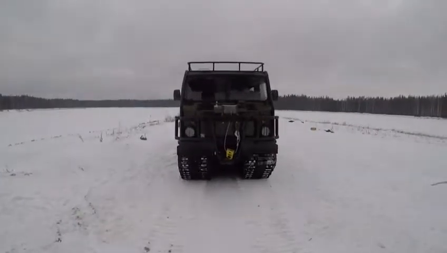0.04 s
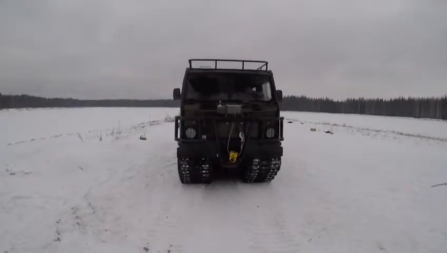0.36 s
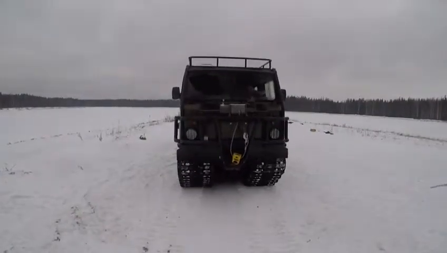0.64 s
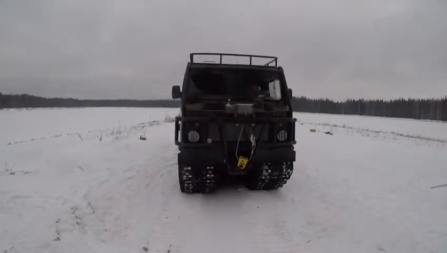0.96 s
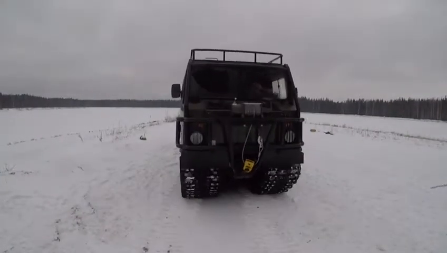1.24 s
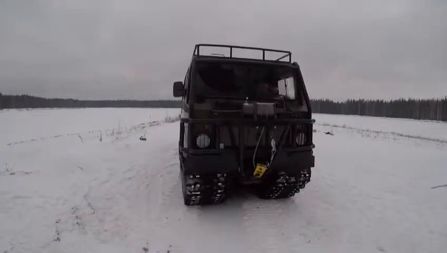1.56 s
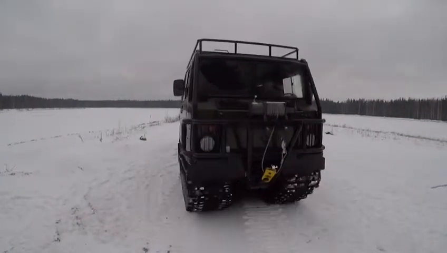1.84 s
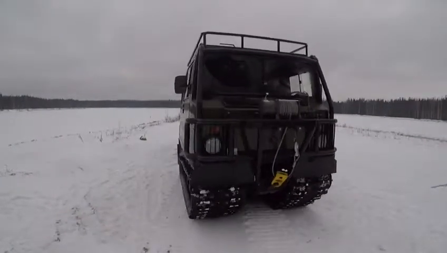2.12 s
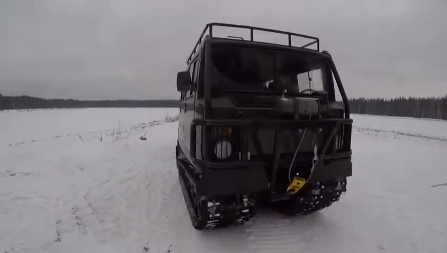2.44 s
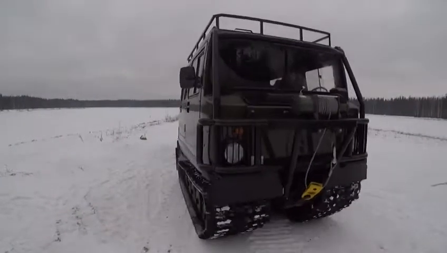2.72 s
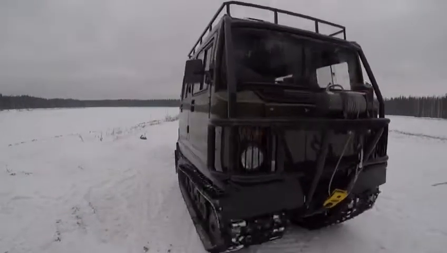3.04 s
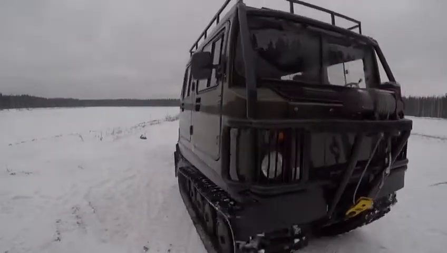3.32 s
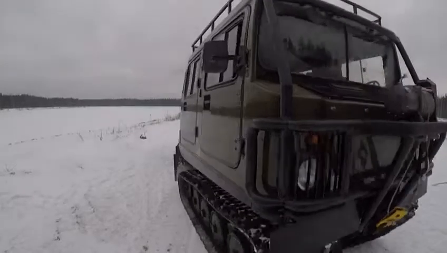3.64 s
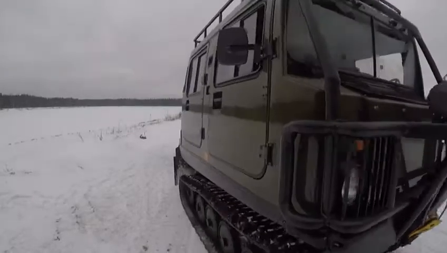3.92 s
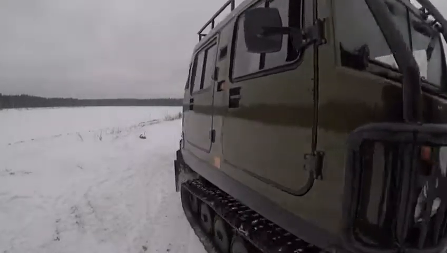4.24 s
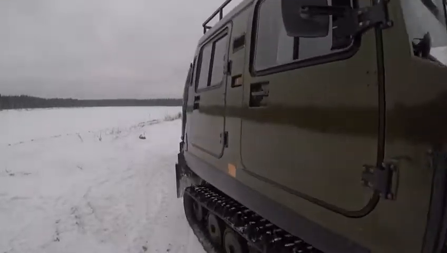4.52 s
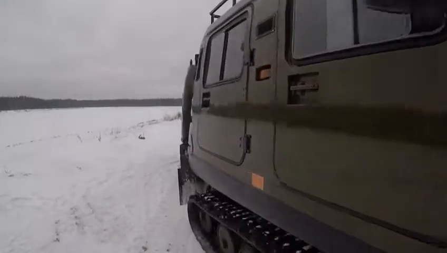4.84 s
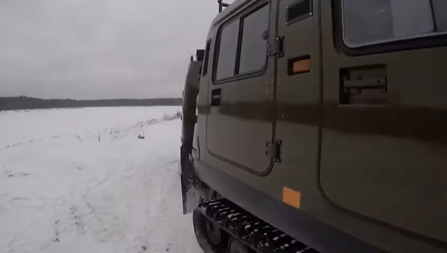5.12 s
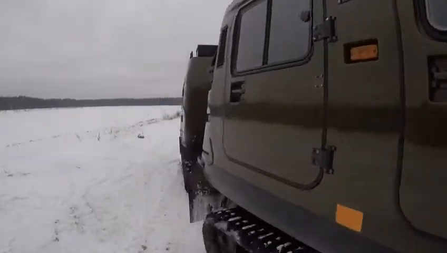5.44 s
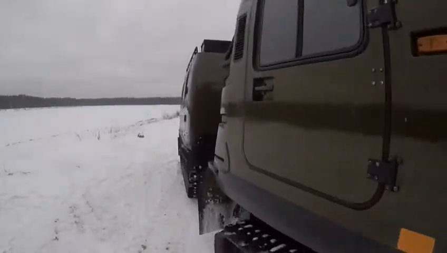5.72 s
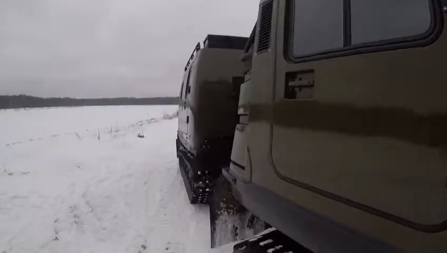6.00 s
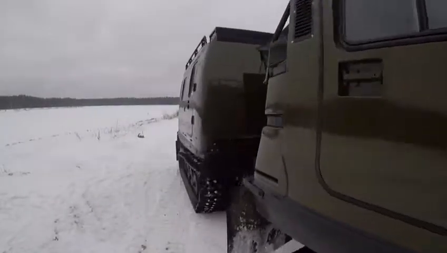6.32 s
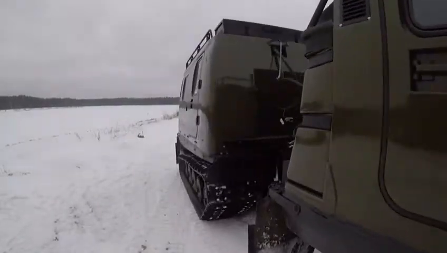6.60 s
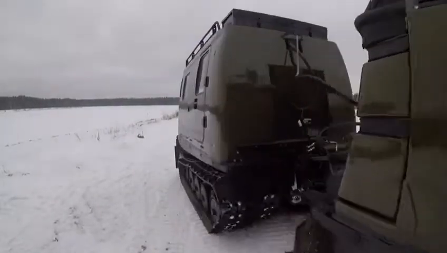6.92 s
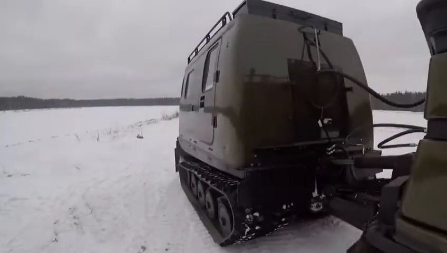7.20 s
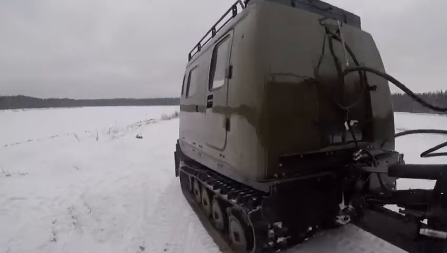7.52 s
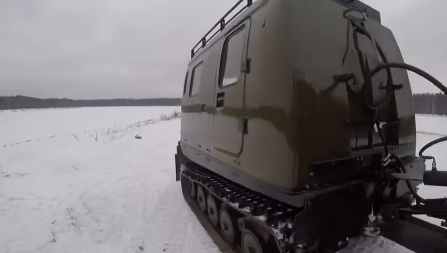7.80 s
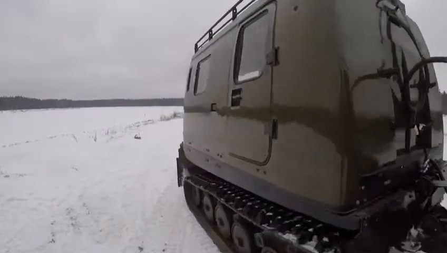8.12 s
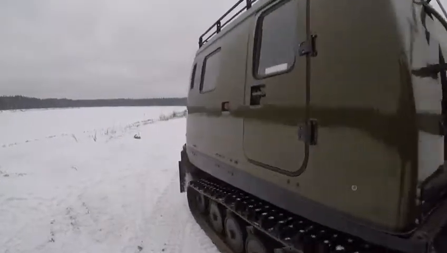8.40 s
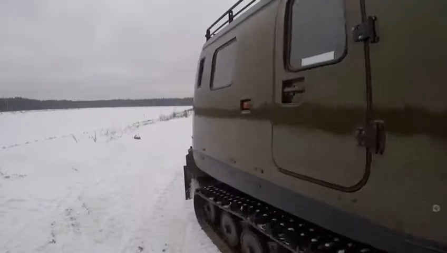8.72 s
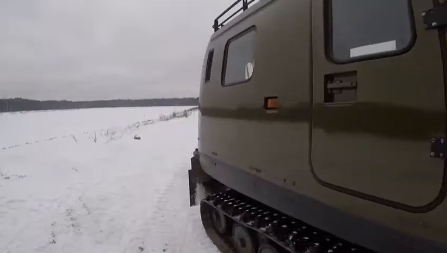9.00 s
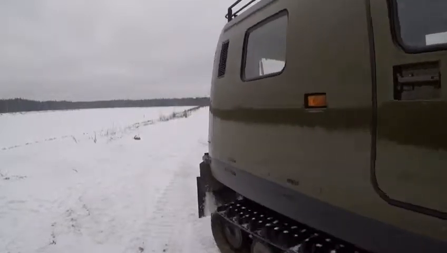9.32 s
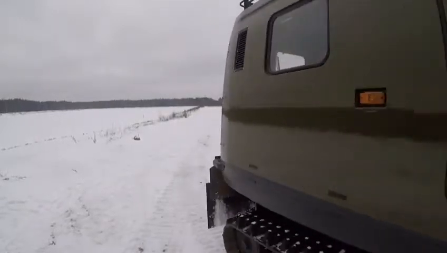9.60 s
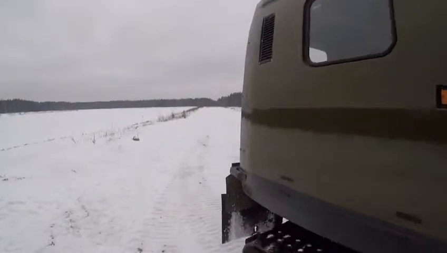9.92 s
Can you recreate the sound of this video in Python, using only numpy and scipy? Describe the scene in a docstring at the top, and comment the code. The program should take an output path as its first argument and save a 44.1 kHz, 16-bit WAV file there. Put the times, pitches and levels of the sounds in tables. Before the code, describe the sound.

A tracked carrier's engine drones and knocks as it crawls over crunching snow and passes close by, its tracks clanking and slapping.

```python
"""A six-cylinder engine drones and knocks ahead of the microphone, out on an open, snowy field.
It drives a two-car tracked carrier that crawls closer and passes at arm's length. The engine whines and
slowly picks up speed; one cylinder knocks about ten times a second until the hull hides it. The running
gear rattles and clanks, snow crunches under the belts, and at the end the rear car's track slaps past."""
import sys
import numpy as np
from scipy import signal
from scipy.fft import rfft, irfft, next_fast_len
from scipy.io import wavfile

SR = 44100
rng = np.random.default_rng(int(sys.argv[2]) if len(sys.argv) > 2 else 0)


def unload_wav(signal):
    """Save mono or channel-first audio to the path in sys.argv[1] as 16-bit WAV at rate SR, clipped to [-1, 1]."""
    wavfile.write(
        sys.argv[1],
        SR,
        np.round(np.clip(np.atleast_2d(signal).T, -1, 1) * 32767).astype(np.int16),
    )


N = 438794


def from_db(db):
    """Decibels to gain."""
    return np.exp(np.asarray(db) * (np.log(10) / 20))

def unit_power(x):
    """Scale to an RMS of 1."""
    return x / np.sqrt(np.mean(x ** 2) + 1e-20)

def in_time(rows):
    """The columns of a curve table, sample by sample."""
    times, *columns = np.transpose(rows)
    return [np.interp(np.arange(N) / SR, times, column) for column in columns]

def in_frequency(rows):
    """The columns of a spectrum table, bin by bin."""
    hz, *columns = np.transpose(rows)
    bins = np.fft.rfftfreq(next_fast_len(N), 1 / SR) + 1e-3
    return [np.interp(np.log(bins), np.log(hz), column) for column in columns]

def filtered(x, gain):
    """Apply a gain per bin."""
    size = next_fast_len(N)
    return irfft(rfft(x, size) * gain, size)[..., :N]

def coloured(x, spectrum):
    """Give x a spectrum that falls away beyond its ends; unit power."""
    (low, low_db), (high, high_db) = spectrum[0], spectrum[-1]
    level_db, = in_frequency([(low / 2, low_db - 40), *spectrum, (high * 2, high_db - 40)])
    return unit_power(filtered(x, from_db(level_db)))

def noise():
    """Two unrelated white noises: the direct and the scattered share of a sound."""
    return rng.standard_normal((2, N))

def drift(rate_hz):
    """A smooth random wander of spread 1."""
    pole = np.exp(-80 * np.pi * rate_hz / SR)
    slow = signal.lfilter([1], [1, -2 * pole, pole * pole], rng.standard_normal(N // 40 + 2002))[2000:]
    return np.interp(np.arange(N) / 40, np.arange(len(slow)), unit_power(slow))

def clicks(times, gains):
    """One click at each time."""
    marks = np.zeros(N)
    np.add.at(marks, np.clip((times * SR).astype(int), 0, N - 1), gains)
    return marks

def blows(times, gains, decay_s):
    """An envelope that jumps at each time and dies away."""
    return signal.lfilter([1], [1, -np.exp(-1 / (decay_s * SR))], clicks(times, gains) + 1e-18)

def grains(per_s, spread_db):
    """Random clicks of uneven size; unit power."""
    sizes = from_db(spread_db * np.minimum(rng.exponential(1, (2, N)), 4))
    return unit_power(noise() * sizes * (rng.random((2, N)) < per_s / SR))

def throb(cycles, depth):
    """One swell per cycle; unit power."""
    return unit_power(np.exp(depth * np.cos(2 * np.pi * cycles)))

def ring(force, hz, t60):
    """A unit click sets a sine of height 1 ringing."""
    pole, angle = from_db(-60 / (t60 * SR)), 2 * np.pi * hz / SR
    return signal.lfilter([0, np.sin(angle)], [1, -2 * pole * np.cos(angle), pole * pole], force + 1e-18)

def struck(times, level_db, modes, scrape, scrape_s, scatter_db):
    """Knocks with a short scrape; each mode swells over a few milliseconds and dies away."""
    force, out = from_db(level_db), 0
    rub = scrape * blows(times, force, scrape_s) * noise() / np.sqrt(scrape_s * SR)
    for k, (hz, mode_db, t60) in enumerate(modes):
        strength = from_db(scatter_db * rng.standard_normal((2, len(times))))
        strength[1] *= rng.choice([-1, 1], len(times))   # the scattered share takes either sign
        knocks = np.array([clicks(times, force * row) for row in strength])
        height = t60 * SR / np.log(1000) / (2 * np.e)
        out += (-1) ** k * from_db(mode_db) / height * ring(ring(knocks + rub, hz, t60), hz, t60)
    return signal.sosfilt(signal.butter(2, modes[0][0] * .7, "high", fs=SR, output="sos"), out)

def passing(level_db, nearest_s, reach_s, approach_db, leave_db):
    """Level of a part driving straight past the microphone; the slopes are dB per doubling of distance."""
    t = np.arange(N) / SR - nearest_s
    return level_db - np.where(t < 0, approach_db, leave_db) * np.log2(np.hypot(1, t / reach_s))

def turning(x, bearing, ahead, alongside):
    """The colour changes as the flank comes into view."""
    return (1 - bearing) * coloured(x, ahead) + bearing * coloured(x, alongside)


# The ground by the microphone. Every _PASS: level_db, nearest_s, reach_s, approach_db, leave_db
GROUND_PASS = (-26, 3.5, 2, 4, -0.5)
# Its rumble. Every _SPECTRUM: frequency_hz, density_db
GROUND_SPECTRUM = [(14, -1), (27, -7), (41, 5), (60, 1), (84, 2), (121, 1), (150, -3), (200, -24)]

def ground_rumble():
    """The ground rumbles as the carrier draws near."""
    return from_db(passing(*GROUND_PASS)) * coloured(noise(), GROUND_SPECTRUM)

# The front belt, down at snow level
BELT_PASS = (-35, 4.5, 0.83, 11.5, 7)
BELT_SPECTRUM = [(330, -11), (400, -1.5), (520, -2.5), (620, 1.5), (730, -2.5), (850, -15)]

def belt_swish():
    """The front belt presses the snow with a soft swish."""
    return from_db(passing(*BELT_PASS)) * coloured(noise(), BELT_SPECTRUM)

# Snow under the belts: time_s, hiss_db, crunch_db
SNOW_LEVEL = [(0.0, -44, -56), (0.5, -45.5, -56), (0.9, -42, -51.5), (1.95, -42.5, -54), (2.3, -38, -48),
              (4.4, -39, -49), (4.6, -39, -45), (5.45, -42.5, -51), (5.8, -39, -42), (6.0, -43, -47.5),
              (6.95, -41, -47), (9.9, -48, -51)]
HISS_SPECTRUM = [(2500, -17), (3400, 7.5), (4200, 6.5), (4900, 6.5), (5800, 10.5), (6400, 9.5),
                 (7200, -7.5), (8500, -37)]
CRUNCH_SPECTRUM = [(5500, -8), (7000, 12), (8000, 9.5), (9200, 8.5), (10200, 2.5), (11000, -7.5),
                   (12000, -46)]

def snow(hiss_db, crunch_db, crusts_per_s=4.5):
    """Snow hisses and crunches; small crusts give way at random, each briefly lifting the crunch."""
    hiss = coloured(noise() * from_db(2.24 * drift(27)), HISS_SPECTRUM)
    crunch = grains(per_s=19000, spread_db=-3.0) * from_db(2.6 * drift(13))
    crust_s = np.flatnonzero(rng.random(N) < crusts_per_s / SR) / SR
    crunch *= 1 + blows(crust_s, rng.random(N)[:len(crust_s)], decay_s=0.033)
    return from_db(hiss_db) * hiss + from_db(crunch_db) * coloured(crunch, CRUNCH_SPECTRUM)

# Cold snow on the approach: centre_s, level_db, pitch_hz, half_length_s, glide_share_per_s
SQUEAKS = [(.091, -44, 3680, .005, -5), (.101, -40, 4330, .006, 4), (.211, -46, 4200, 0.011, 1),
           (.89, -39, 4520, 0.012, 1), (.92, -53, 5600, .008, 6), (2.32, -42, 5700, .007, -2),
           (2.44, -40.5, 5760, .009, 1), (2.52, -43, 5400, 0.0097, 3), (2.62, -46, 5360, .008, -3),
           (2.645, -42.5, 4600, 0.014, -8), (2.75, -45, 5060, .008, 0), (2.885, -49, 6600, .01, 0),
           (2.972, -40.5, 6270, 0.0091, 3), (3.01, -43, 4300, .008, 7), (3.13, -46.5, 6600, 0.013, 7),
           (3.165, -42.5, 4180, 0.021, -6.5), (3.375, -42, 6240, 0.01, 6), (4.268, -37, 5710, 0.016, 4),
           (4.457, -41, 5500, .008, -1.5), (4.572, -40, 5000, .01, -1), (4.712, -44, 5040, .008, -3),
           (4.827, -41, 5280, 0.018, 5.5)]

def snow_squeaks(faint_db, gain_db=5.0, faint_per_s=7, low_hz=4130, high_hz=6770, hoarseness=0.25):
    """Snow grains stick and slip under the rubber: brief, hoarse chirps, with fainter ones at random."""
    out, t = np.zeros((2, N)), np.arange(-SR // 20, SR // 20) / SR
    at = np.flatnonzero(rng.random(N - len(t)) < faint_per_s / SR) + len(t) // 2
    tone, size, bend = rng.random((len(at), 3)).T
    faint_hz = low_hz + tone * (high_hz - low_hz)
    faint = zip(at / SR, faint_db[at], faint_hz, 0.019 * (.5 + size), 1.7 * (2 * bend - .5))
    for centre_s, level_db, hz, half_length_s, glide in [*SQUEAKS, *faint]:
        pitch_hz = hz * (1 + glide * t + hoarseness * rng.standard_normal((2, len(t))))
        chirp = np.exp(-(t / half_length_s) ** 2) * np.sin(2 * np.pi * np.cumsum(pitch_hz, axis=1) / SR)
        start = max(int((centre_s + t[0]) * SR), 0)
        out[:, start:start + len(t)] += from_db(level_db + gain_db) * chirp
    stutter = unit_power(from_db(1.5 * drift(120)))
    return out * stutter

# Creaks, knocks and cracks close to the microphone: start_s, level_db, pitch_hz, decay_s
CREAKS_AND_CRACKS = [(3.80, -27.5, 835, 0.088), (3.93, -30, 825, 0.036), (4.378, -27, 2420, 0.007),
                     (4.555, -32, 6500, 0.012), (4.646, -31.5, 2460, 0.017), (4.748, -30, 2320, 0.0082),
                     (4.829, -25, 890, 0.0072), (4.908, -17, 754, 0.0055), (5.003, -19.5, 695, 0.0044),
                     (5.213, -39.5, 8400, 0.015), (5.57, -43, 8140, .012), (5.73, -29, 6700, 0.014),
                     (5.83, -42, 7900, .012), (5.895, -43, 8700, 0.0082), (6.62, -46, 10000, .014),
                     (6.723, -42, 8900, .013), (6.916, -37.5, 8050, 0.025), (7.321, -43, 8950, 0.013),
                     (8.078, -33, 4770, 0.0099)]

def creaks_and_cracks(gain_db=-1.5, band_ratio=1.21, rise_share=0.38):
    """Low creaks and knocks from the passing carrier, and high snow cracks: short bands of noise."""
    out, t = np.zeros((2, N)), np.arange(SR // 5) / SR
    for start_s, level_db, hz, decay_s in CREAKS_AND_CRACKS:
        band = signal.butter(2, [hz / band_ratio, hz * band_ratio], "band", fs=SR, output="sos")
        burst = unit_power(signal.sosfilt(band, rng.standard_normal((2, len(t)))))
        envelope = (1 - np.exp(-t / (rise_share * decay_s))) * np.exp(-(t / decay_s) ** 2 / 2)
        start = int(start_s * SR)
        out[:, start:start + len(t)] += from_db(level_db + gain_db) * burst * envelope
    return out

# The hull and the engine bay, head-on and at arm's length
HULL_PASS = (-25.5, 5.5, 0.97, 2, 1.5)
HULL_AHEAD_SPECTRUM = [(110, -8.5), (150, -5.5), (183, 6.5), (220, -4), (265, 0), (300, -14), (350, -25),
                       (600, -38)]
HULL_NEAR_SPECTRUM = [(110, -20), (156, -11), (186, -3.5), (222, -2.5), (268, -6.5), (306, -3), (350, -35),
                      (600, -41)]
BAY_PASS = (-28.5, 8, 4, 9.5, 41)
BAY_AHEAD_SPECTRUM = [(250, -19), (330, -6), (390, -2.5), (490, -2), (580, -3), (700, -9.5), (850, -11.5),
                      (1100, -32), (2000, -23)]
BAY_NEAR_SPECTRUM = [(240, -3.5), (320, 8.5), (410, 2.5), (520, 3), (640, -3.5), (780, -8), (1000, -11.5),
                     (2000, -28)]

def shaking(cycles, repeat_share, size=4096):
    """Panels shake partly by chance, partly in a slowly changing pattern that repeats each engine cycle."""
    patterns = unit_power(irfft(np.exp(2j * np.pi * rng.random((2, size // 2 + 1)))))
    first, second = patterns[:, (cycles * size).astype(int) % size]
    angle = drift(0.69)
    cos, sin = np.cos(angle), np.sin(angle)
    repeating = np.array([first * cos + second * sin, second * cos - first * sin])
    return np.sqrt(repeat_share) * repeating + np.sqrt(1 - repeat_share) * noise()

def hull_panels(cycles, below_cruise_hz, bearing, loss_db_per_hz=1):
    """The engine shakes the hull, less so below cruising speed."""
    gain = from_db(passing(*HULL_PASS) - loss_db_per_hz * below_cruise_hz)
    panels = shaking(cycles, repeat_share=0.74)
    return gain * turning(panels, bearing, HULL_AHEAD_SPECTRUM, HULL_NEAR_SPECTRUM)

def engine_bay(cycles, firings, bearing):
    """The bay's panels shake, swelling slightly with each firing."""
    panels = shaking(cycles, repeat_share=0.36) * throb(firings, depth=0.095)
    return from_db(passing(*BAY_PASS)) * turning(panels, bearing, BAY_AHEAD_SPECTRUM, BAY_NEAR_SPECTRUM)

# The running gear of both cars, head-on and at arm's length
FRONT_GEAR_PASS = (-32.5, 3.5, 1.53, 3.5, 18)
REAR_GEAR_PASS = (-37, 8, 1.5, 1, 9)
GEAR_AHEAD_SPECTRUM = [(600, -33.5), (900, -3.5), (1080, 11.5), (1220, 2.5), (1400, 4), (1650, 2.5),
                       (2100, -7.5), (2500, -8.5), (3000, -6), (3600, -16.5), (5000, -18.5), (8000, -88)]
GEAR_NEAR_SPECTRUM = [(600, -13), (900, 3.5), (1100, 7), (1350, 5.5), (1650, 2), (2100, -1.5), (2600, -2.5),
                      (3100, -4), (3600, -9.5), (5000, -17), (8000, -40)]

def gear_rattle(cycles, firings, bearing):
    """Loose parts of both cars chatter in time with the engine."""
    beat = throb(cycles - .25, depth=0.13) * throb(firings, depth=0.037)
    rattle = grains(per_s=14000, spread_db=-1.0) * beat * from_db(drift(25))
    gain = np.hypot(from_db(passing(*FRONT_GEAR_PASS)), from_db(passing(*REAR_GEAR_PASS)))
    return gain * turning(rattle, bearing, GEAR_AHEAD_SPECTRUM, GEAR_NEAR_SPECTRUM)

# Wheels and links sliding past the microphone: start_s, level_db, pitch_hz
CLANKS = [(5.316, -31.5, 1210), (5.406, -34, 1190), (5.508, -32, 1390), (5.606, -32.5, 1450),
          (5.708, -32, 1350), (5.881, -36.5, 1500), (5.974, -34, 1550), (6.166, -40.5, 1210),
          (6.313, -32, 1530), (6.42, -32.5, 1700), (6.535, -40, 1890), (6.721, -43, 1460),
          (6.893, -35, 1600), (7.08, -34.5, 1880), (7.14, -33, 1500), (7.172, -31, 1600),
          (7.262, -35.5, 1500), (7.355, -33.5, 1780), (7.44, -36, 1980), (7.536, -35, 1400),
          (7.625, -35, 1300), (7.721, -36, 1400), (7.892, -35, 1400), (7.987, -33, 1130), (8.04, -37, 1630),
          (8.336, -34, 1300), (8.608, -37, 1920)]
# Their ringing steel: pitch_ratio, level_db
CLANK_MODES = [(.74, 1), (1.0, 1), (1.24, -6)]

def gear_clanks(gain_db=-8.5, swell_s=0.01, t60=0.012):
    """Loose steel chatters for a moment, each part ringing at a pitch of its own."""
    out, t = np.zeros((2, N)), np.arange(SR // 8) / SR
    for start_s, level_db, hz in CLANKS:
        chatter = np.gradient(rng.standard_normal((2, len(t))) * t * np.exp(-t / swell_s), axis=1)
        steel = sum((-1) ** k * from_db(mode_db) * ring(chatter, hz * ratio, t60)
                    for k, (ratio, mode_db) in enumerate(CLANK_MODES))
        clank = np.array([unit_power(share) for share in steel])
        start = int(start_s * SR)
        out[:, start:start + len(t)] += from_db(level_db + gain_db) * clank
    return out

# The rear car's track at arm's length: start_s, thud_db, clack_db
SLAPS = [(7.46, -25.5, -36), (7.836, -26, -41), (7.936, -22, -36), (8.004, -25, -34), (8.206, -24, -38),
         (8.301, -22.5, -39), (8.35, -23, -37), (8.481, -22.5, -38), (8.645, -26, -43), (8.753, -24.5, -40),
         (8.858, -21, -35), (8.961, -18.5, -43), (9.042, -21.5, -32), (9.146, -21, -37), (9.232, -21, -35),
         (9.325, -20.5, -24), (9.41, -19.5, -28.5), (9.507, -21.5, -29), (9.594, -23, -28),
         (9.692, -20, -29), (9.785, -23, -31.5), (9.87, -25.5, -28.5)]
# Rubber belt and wheel: pitch_hz, level_db, t60_s
BELT_MODES = [(324.5, -6.5, 0.04), (415, -6, 0.042), (493, -3.5, 0.03), (576, -9.5, 0.027),
              (695, -9, 0.024)]
WHEEL_MODES = [(804, -1.5, 0.012), (1120, -10, 0.017), (1306, -7, 0.01), (1580, -11.5, 0.013)]

def track_slaps(lead_s=0.0041, bounce_s=0.024, bounce_db=-10.0):
    """The belt clacks against a wheel, then its rubber lands with a thud and bounces once."""
    start_s, thud_db, clack_db = np.transpose(SLAPS)
    landing_s = np.r_[start_s, start_s + bounce_s]
    landing_db = np.r_[thud_db, thud_db + bounce_db] + 0.5
    thuds = struck(landing_s, landing_db, BELT_MODES, scrape=0.88, scrape_s=0.01, scatter_db=2.5)
    clacks = struck(start_s - lead_s, clack_db + 1, WHEEL_MODES, scrape=1.44, scrape_s=0.018, scatter_db=3.5)
    return thuds + clacks

# Clatter from the grille, soon hidden from the microphone by the hull: time_s, level_db
CLATTER_LEVEL = [(0, -25.5), (.75, -18.5), (1.15, -20.5), (1.5, -18), (2.7, -22), (3.05, -16.5), (3.5, -21),
                 (4.3, -26), (4.7, -29), (5.2, -32), (6, -39), (9.95, -43)]
# The six firings: place_in_cycle, level_db
CYLINDERS = [(.015, -5.5), (.182, 0.5), (.365, -10.5), (.527, -4), (.71, -13.5), (.875, -22)]
# The engine block: pitch_hz, level_db, t60_s
BLOCK_MODES = [(1130, -14.5, 0.013), (1201, 0, 0.027)]

def combustion_clatter(cycles, uneven_db=0.3, jitter_s=0.00056):
    """Every firing rings the engine block, each cylinder with a strength of its own."""
    place, cylinder_db = np.transpose(CYLINDERS)
    whole_cycles = np.arange(int(cycles[-1]))
    at = np.minimum(np.searchsorted(cycles, whole_cycles[:, None] + place), N - 1)
    level_db = in_time(CLATTER_LEVEL)[0][at] + cylinder_db + uneven_db * rng.standard_normal(at.shape)
    times = at / SR + jitter_s * rng.standard_normal(at.shape)
    return struck(times.ravel(), level_db.ravel(), BLOCK_MODES, scrape=0.14, scrape_s=0.0034, scatter_db=2.1)

# The noisy cylinder, heard from in front: start_s, level_db
KNOCKS = [(.115, -31.5), (.226, -32), (.336, -32), (0.447, -41), (0.55, -31.5), (0.656, -29), (0.76, -30),
          (.862, -29.5), (.965, -34), (1.067, -33), (1.17, -29), (1.272, -27), (1.376, -30), (1.476, -27),
          (1.579, -29.5), (1.676, -28.5), (1.775, -27.5), (1.873, -24), (1.97, -31.5), (2.067, -28.5),
          (2.162, -25.5), (2.259, -28), (2.358, -26), (2.456, -23), (2.551, -26), (2.649, -29),
          (2.744, -30), (2.842, -24.5), (2.937, -31), (3.04, -27), (3.132, -29), (3.229, -30), (3.328, -30),
          (3.424, -37), (3.616, -33), (3.712, -44), (3.81, -25.5), (3.903, -26), (4.001, -26.5),
          (4.095, -28), (4.187, -25), (4.285, -39), (4.377, -33), (4.468, -32), (4.654, -41), (4.749, -39),
          (4.938, -32.5), (5.024, -30.5), (5.12, -32), (5.236, -32.5)]
# The engine ringing under its blows: pitch_hz, level_db, t60_s
KNOCK_MODES = [(1113, -1, 0.015), (1272, -8, 0.029), (1490, -15, 0.011), (1612, 0, 0.023),
               (1890, -3.5, 0.015), (2290, -11.5, 0.0093), (2786, -10, 0.02), (3180, -10, .013)]

def cylinder_knock(rebound_s=0.0055):
    """One cylinder gives a hard, bright knock and a rebound in most cycles of the approach."""
    start_s, level_db = np.transpose(KNOCKS)
    blow = struck(start_s, level_db - 1.2, KNOCK_MODES, scrape=1, scrape_s=0.0079, scatter_db=1.8)
    rebound = struck(start_s + rebound_s, level_db - 3, KNOCK_MODES, scrape=1, scrape_s=.008, scatter_db=-2)
    return blow + rebound

# The whine at the microphone: time_s, order_16_db, order_32_db
WHINE_LEVELS = [(0, -66, -68), (.4, -57, -61), (.7, -40, -48), (1.05, -47, -45), (1.4, -54, -58),
                (1.7, -38.5, -59), (2.2, -43, -60), (3.2, -42.5, -64), (3.7, -50, -59), (4.75, -36.5, -51),
                (5.4, -48, -45.5), (6.9, -37, -47), (7.5, -47.5, -59), (7.9, -34.5, -46), (8.6, -43.5, -49),
                (9.95, -53, -58)]

def engine_whine(bank_firings, flutter_db=3.0, wander_rad=1.07):
    """A high engine order and its octave flutter in level and wander in phase."""
    direct = np.zeros(N)
    for order, level_db in zip((16, 32), in_time(WHINE_LEVELS)):
        gain = from_db(level_db + flutter_db * drift(10.6))
        direct += gain * np.cos(2 * np.pi * order * bank_firings + wander_rad * drift(4.2))
    return np.sqrt(2) * direct * [[1], [0]]   # no scattered share

# The loudest notes, swelling in turn as the hull slides past the microphone: time_s, level_db
ORDER_2 = [(0.0, -28.5), (5.05, -20.5), (6.1, -24.5), (6.5, -44), (7.3, -23), (8.45, -20), (8.95, -24),
           (9.9, -21.5)]
ORDER_3 = [(0.0, -44), (0.4, -31.5), (2.05, -27), (4.05, -29.5), (4.75, -37), (6.65, -21.5), (8.1, -18),
           (9.9, -34.5)]
ORDER_4 = [(0.0, -37), (1.4, -43), (2.55, -31.5), (3.65, -28.5), (4.65, -22.5), (6.25, -31), (7.9, -24),
           (9.9, -29)]
ORDER_8 = [(0, -41), (.45, -41), (.7, -39), (1.5, -34), (2, -31), (3, -32.5), (3.5, -39), (4.2, -30.5),
           (4.95, -31.5), (5.3, -26.5), (5.75, -22), (6.45, -28), (6.9, -25), (7.65, -33), (8.2, -30.5),
           (9.95, -45.5)]
# Their neighbours: time_s, order_6_db, order_7_db, order_9_db
ORDERS_6_7_9 = [(0, -54, -54, -50), (.85, -46, -46, -35.5), (1.7, -47, -38, -45), (2.6, -32, -42, -43),
                (4.8, -30, -42, -46), (5.35, -26.5, -31, -33), (6, -28.5, -30, -39), (7.4, -28, -33, -46),
                (8.2, -29, -47, -45), (9.7, -24.5, -46, -45)]
# Faint wavering engine notes, some weaker below cruising speed: order, level_db, loss_db_per_hz, waver_db
WEAK_ORDERS = [(1, -51, 9, 6), (5, -41.5, 0, 5), (10, -48.5, 5, 4.5), (13, -53, 1, 5), (17, -50, -0.5, 4.5)]
# Notes that uneven cylinders add between the orders: cycle_multiple, level_db, loudest_s, reach_s
CYCLE_NOTES = [(25, -30, 6.17, 0.31), (28, -37.5, 6.8, .55), (38, -37, 7.24, .35), (50, -45, 2.7, 0.69)]

def engine_drone(bank_firings, below_cruise_hz, gain_db=0.2, waver_db_per_octave=1.07, smear_rad=1.0):
    """Orders (multiples) of one bank's firing rate, each wavering with uneven combustion."""
    tables = (ORDER_2, ORDER_3, ORDER_4, ORDER_8, ORDERS_6_7_9)
    levels = [level for table in tables for level in in_time(table)]
    phase = 2 * np.pi * (bank_firings + 0.00072 * drift(2.8))
    direct = np.zeros(N)
    for order, level_db in zip((2, 3, 4, 8, 6, 7, 9), levels):
        waver_db = waver_db_per_octave * np.log2(order / 2) * drift(8.5)
        silencer_lag = smear_rad * order ** 2   # the silencer delays high orders more
        direct -= from_db(level_db + gain_db + waver_db) * np.cos(order * phase - silencer_lag)
    for order, level_db, loss_db_per_hz, waver_db in WEAK_ORDERS:
        gain = from_db(level_db - loss_db_per_hz * below_cruise_hz + waver_db * drift(4.9))
        direct += gain * np.cos(order * phase + 2 * np.pi * rng.random())
    for multiple, level_db, loudest_s, reach_s in CYCLE_NOTES:
        swell = from_db(level_db) * np.exp(-((np.arange(N) / SR - loudest_s) / reach_s) ** 2)
        direct += swell * np.cos(multiple * phase / CYLINDERS_PER_BANK + 2 * np.pi * rng.random())
    return np.sqrt(2) * direct * [[1], [0]]

# The microphone's two ports, carrier ahead and alongside: frequency_hz, left_minus_right_db, likeness
PORTS_AHEAD = [(60, 1, 0.74), (240, 4.5, 0.94), (523, 9, 0.77), (800, 0.5, 0.2), (1200, -2.5, 0.73),
               (1800, 1, 1), (3030, -0.5, 1), (6160, 3.5, 1), (9000, -6.5, .15)]
PORTS_ALONGSIDE = [(60, 0.4, 0.92), (240, 6, 0.89), (520, 5.5, 0.37), (800, -1.5, -0.59),
                   (1200, -11.5, -0.75), (1800, -9, -0.3), (3000, -6, 0.31), (5800, 1, -0.63),
                   (9000, -7.5, -0.4)]
# The part of their unlikeness that is a quarter-cycle lead on the left: frequency_hz, lead_share
PORT_LEAD = [(60, 0.11), (120, 0.57), (240, -.05), (380, -.48), (520, -.75), (800, -.7), (1200, -0.38),
             (1800, -.15), (5000, -.27), (9000, .1)]

def side_signal(sound, ports):
    """The left-right difference that gives the ports their balance, likeness and phase."""
    balance_db, likeness = in_frequency(ports)
    balance, likeness = from_db(balance_db), np.clip(likeness, -.99, .99)
    lead, = in_frequency(PORT_LEAD)
    unlikeness = 2 * np.sqrt(1 - likeness ** 2)
    direct = balance - 1 / balance + 1j * lead * unlikeness
    scattered = np.sqrt(1 - lead ** 2) * unlikeness
    gains = np.array([direct, scattered]) / (balance + 1 / balance + 2 * likeness)
    return filtered(sound, gains).sum(axis=0)

# Engine speed across the field: time_s, bank_firing_hz
ENGINE_SPEED = [(0.0, 26.21), (0.62, 28.74), (1.0, 29.46), (1.3, 29.02), (1.95, 31.19), (2.3, 30.8),
                (2.6, 31.02), (3.65, 30.97), (4.15, 31.99), (4.85, 32.65), (5.3, 31.52), (5.85, 31.75),
                (6.2, 32.46), (6.9, 33.13), (9.1, 33.63), (9.6, 34.29), (9.95, 35.41)]
CYLINDERS_PER_BANK, CRUISE_HZ = 3, 32.2
# The carrier as seen from the microphone: time_s, bearing (0 ahead, 1 alongside)
BEARING = [(0, 0.037), (1.8, 0.047), (3.0, 0.26), (4.0, 0.48), (5.2, 0.73), (9.95, 0.93)]

def scene():
    """Engine, hull, tracks and snow, moving from straight ahead to beside the microphone."""
    bank_hz, = in_time(ENGINE_SPEED)
    below_cruise_hz = np.maximum(CRUISE_HZ - bank_hz, 0)
    bank_firings = np.cumsum(bank_hz) / SR
    cycles, firings = bank_firings / CYLINDERS_PER_BANK, 2 * bank_firings
    bearing, = in_time(BEARING)
    hiss_db, crunch_db = in_time(SNOW_LEVEL)

    sound = engine_drone(bank_firings, below_cruise_hz) + engine_whine(bank_firings)
    sound += ground_rumble()
    sound += hull_panels(cycles, below_cruise_hz, bearing) + engine_bay(cycles, firings, bearing)
    sound += belt_swish() + gear_rattle(cycles, firings, bearing)
    sound += snow(hiss_db - 4, crunch_db - 5)
    sound += combustion_clatter(cycles) + cylinder_knock()
    sound += track_slaps() + gear_clanks()
    sound += creaks_and_cracks() + snow_squeaks(faint_db=crunch_db - 4)
    side = (1 - bearing) * side_signal(sound, PORTS_AHEAD) + bearing * side_signal(sound, PORTS_ALONGSIDE)
    return np.array([sound[0] + side, sound[0] - side])

def record(dry):
    """A steep low-pass cuts the treble above 11.6 kHz."""
    return signal.sosfilt(signal.ellip(10, .2, 80, 11600, fs=SR, output="sos"), dry)


dry = scene()
out = record(dry)
unload_wav(out)
```